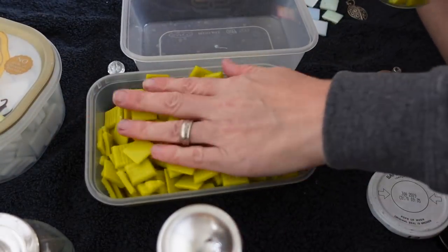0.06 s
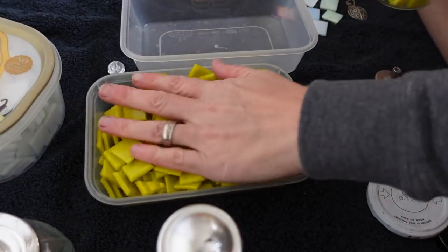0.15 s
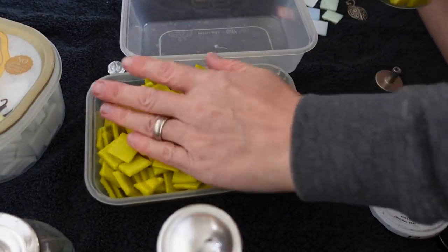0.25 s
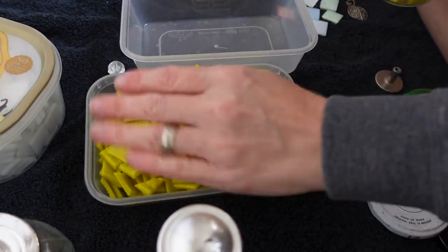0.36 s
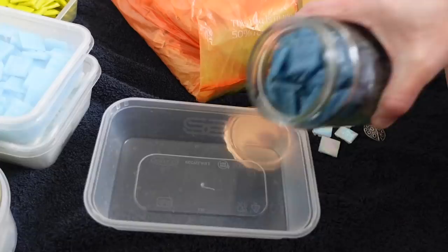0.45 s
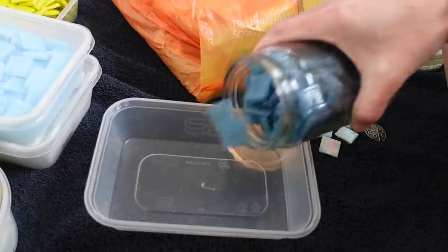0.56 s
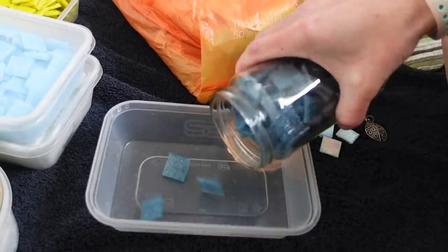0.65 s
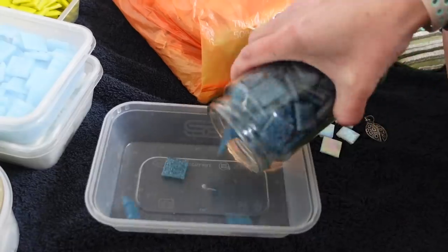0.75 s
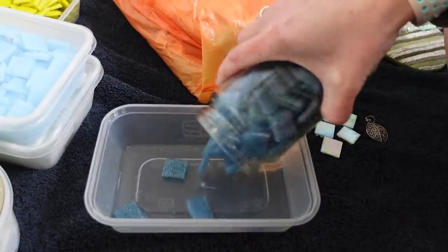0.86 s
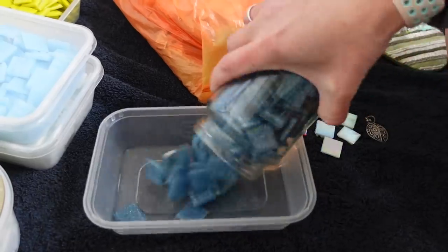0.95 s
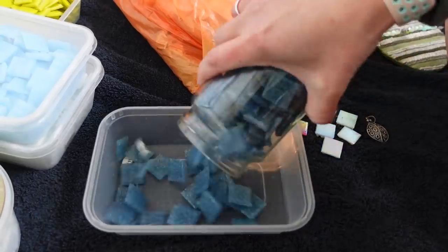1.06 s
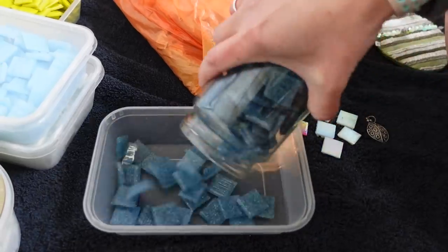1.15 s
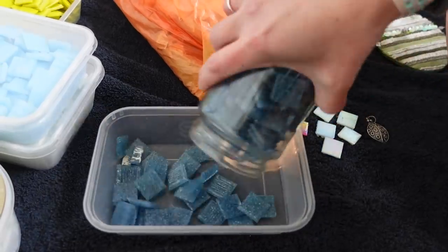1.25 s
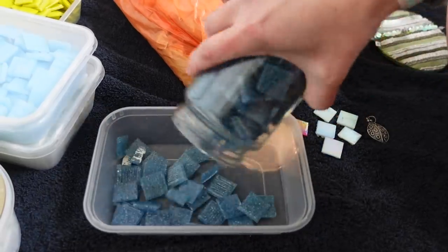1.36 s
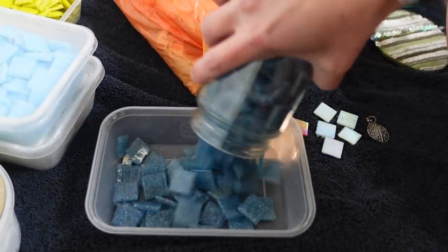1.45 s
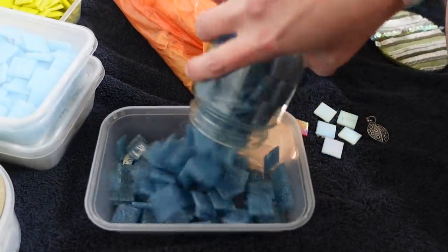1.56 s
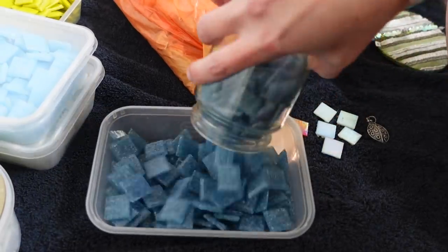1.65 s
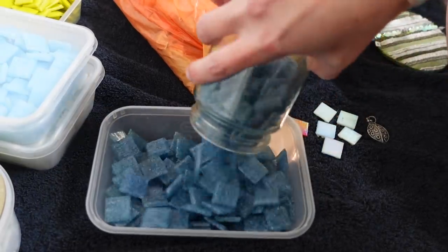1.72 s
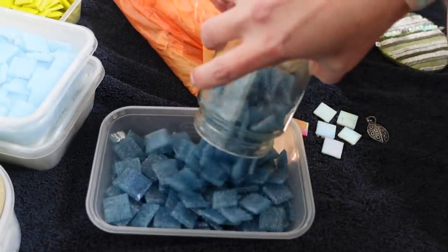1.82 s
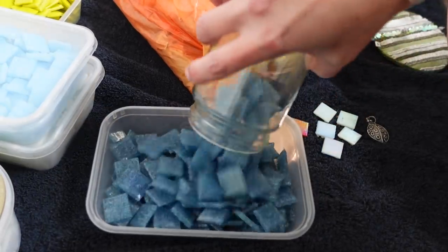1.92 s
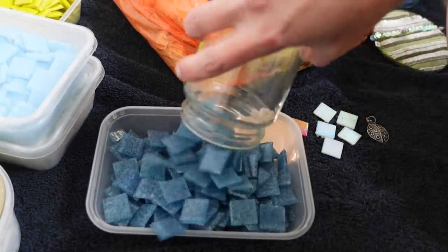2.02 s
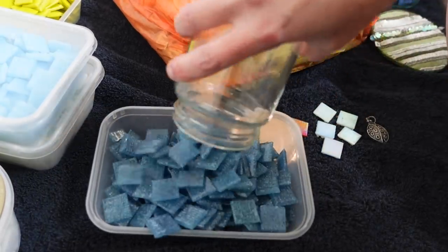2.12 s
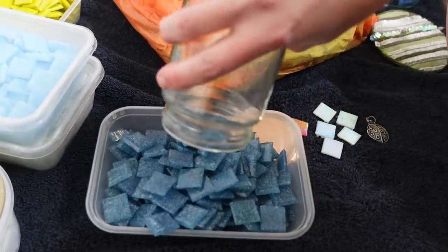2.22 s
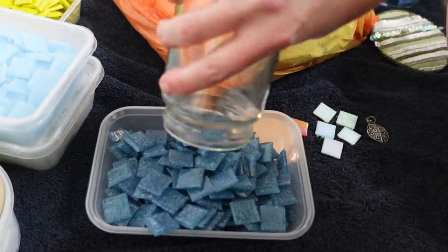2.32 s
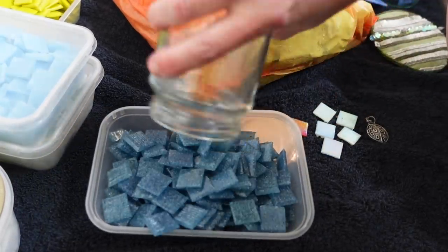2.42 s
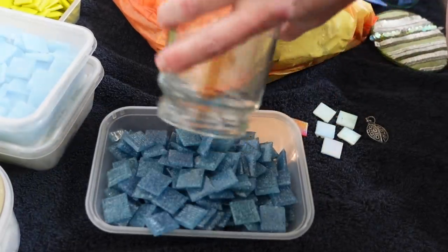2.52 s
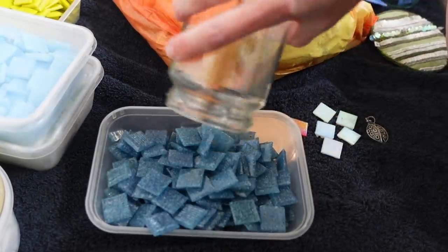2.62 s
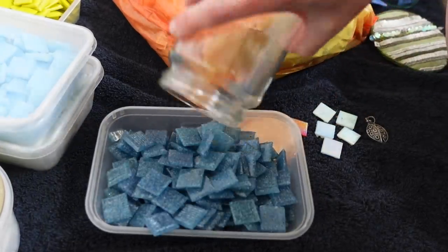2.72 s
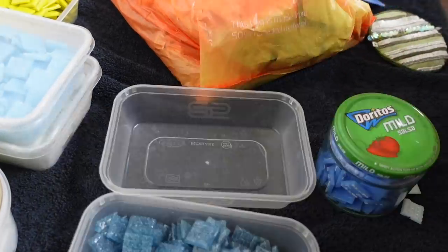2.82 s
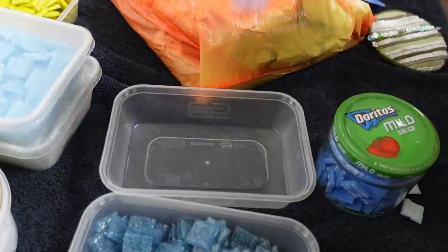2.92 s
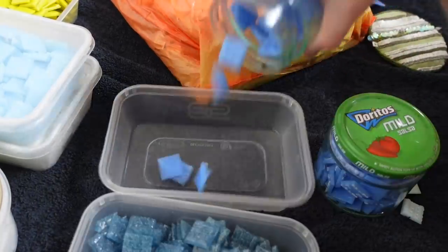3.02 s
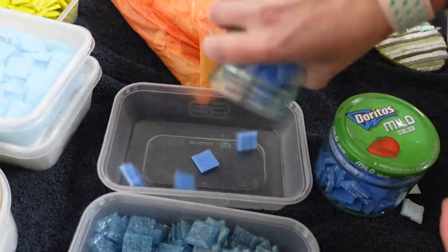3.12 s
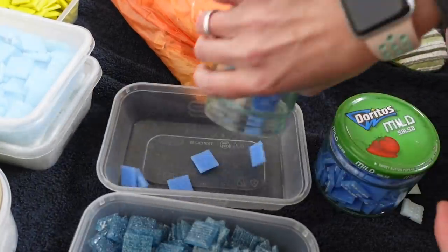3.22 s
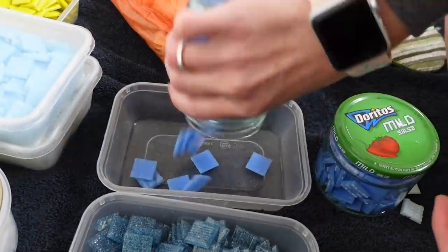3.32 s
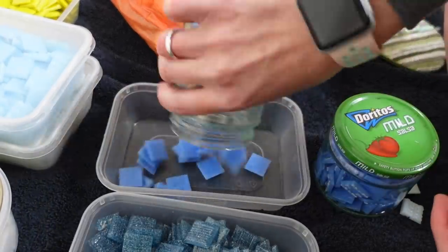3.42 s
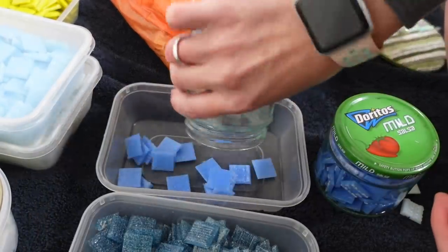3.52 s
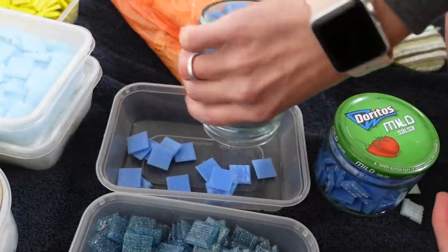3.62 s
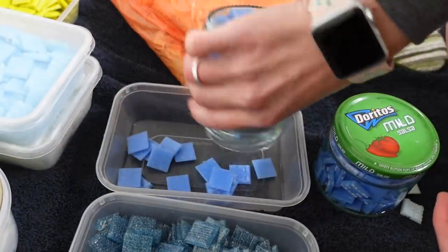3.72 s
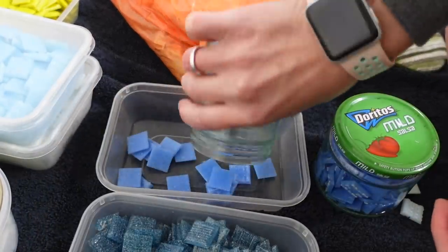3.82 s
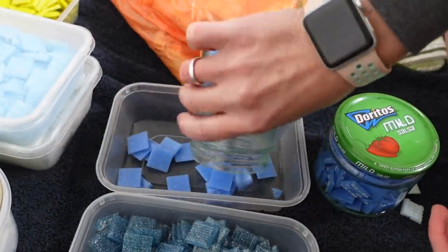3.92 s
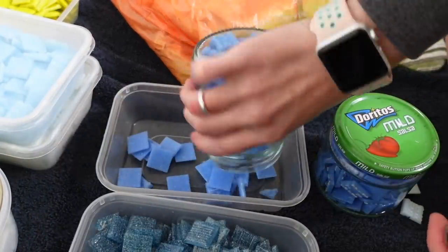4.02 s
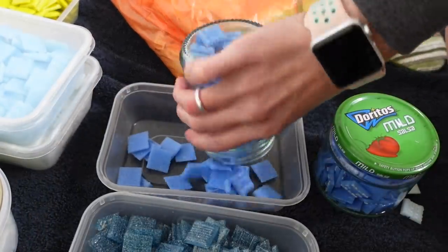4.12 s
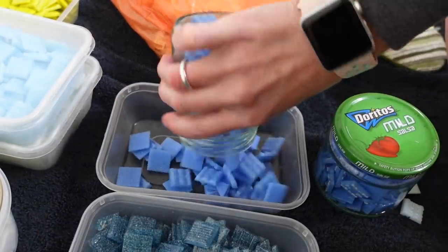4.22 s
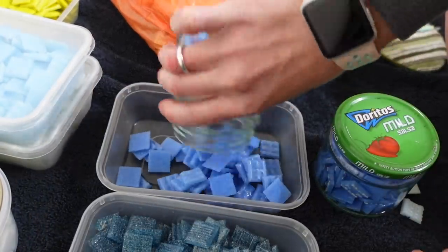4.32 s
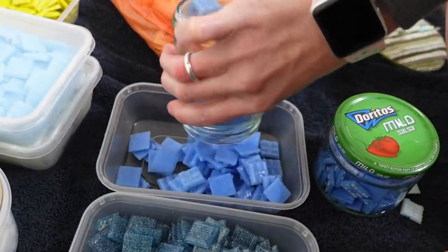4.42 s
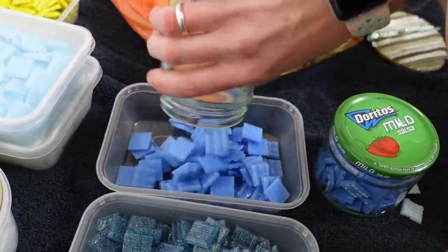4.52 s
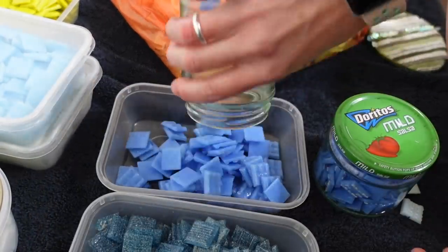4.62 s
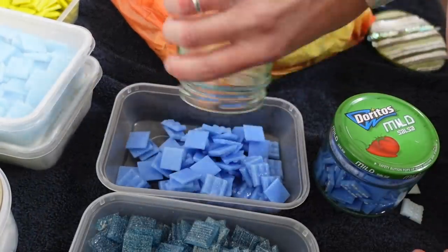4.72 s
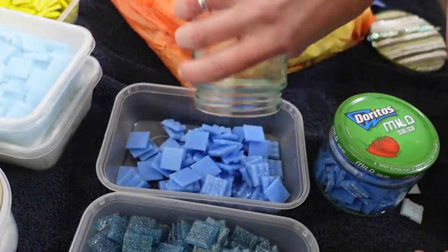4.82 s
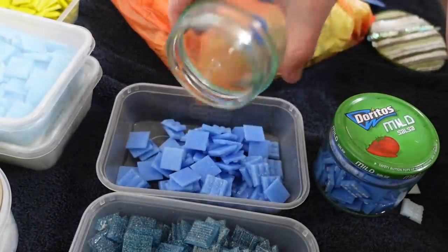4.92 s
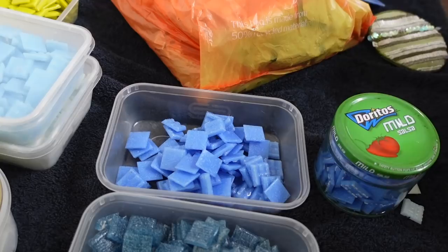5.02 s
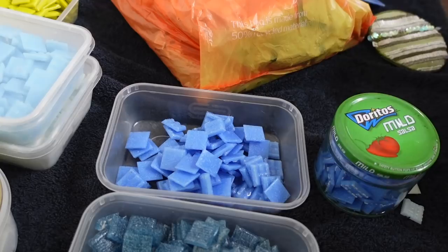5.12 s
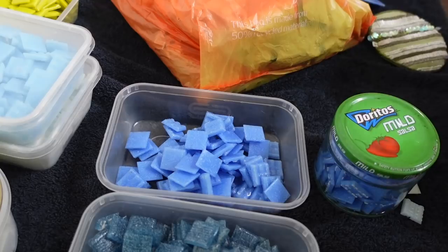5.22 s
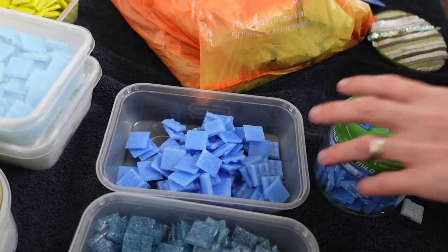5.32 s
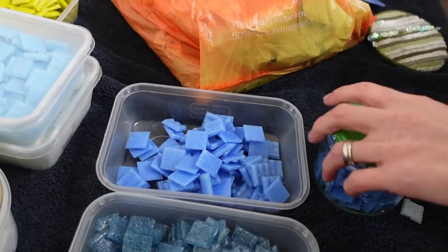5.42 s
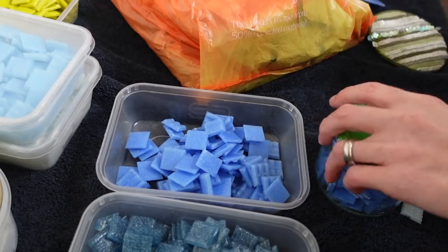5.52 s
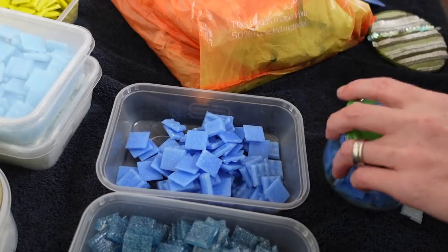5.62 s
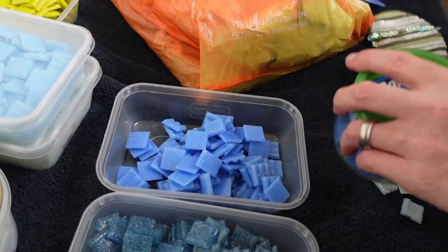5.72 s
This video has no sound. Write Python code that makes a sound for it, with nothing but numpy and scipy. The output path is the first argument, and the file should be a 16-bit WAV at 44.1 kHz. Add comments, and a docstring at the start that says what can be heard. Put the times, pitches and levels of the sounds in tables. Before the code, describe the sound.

Indoors and close-miked: short scraping clicks of stirred glass tiles, then two pours from jars into plastic tubs. The first builds quickly into a thick, crisp cascade; the second starts with single tiles dropping, pauses, then spills in surges with ringing jar clinks. Each changes from hollow plastic knocks to dense glass-on-glass clatter. Finally a near-silent gap with soft hum and one light metallic lid tap.

```python
"""A work table in a small live room: glass mosaic tiles. A hand spreads a tubful, then two glass jars
are tipped into plastic tubs in surges; at the end a hand taps a jar's metal lid.
Sliding, clicking, clinking and landing are noise-cracked decaying modes, set off singly from tables
or as random streams under surge envelopes; filling tubs shift the sound from plastic to heap.
A noise tail gives the room, shaped noise the air and hum; bass ducking and a limiter follow."""
import sys
import numpy as np
from scipy import signal
from scipy.fft import rfft, irfft, next_fast_len
from scipy.io import wavfile
from scipy.ndimage import uniform_filter1d, minimum_filter1d, map_coordinates

SR = 44100
rng = np.random.default_rng(int(sys.argv[2]) if len(sys.argv) > 2 else 0)


def output_pcm(signal):
    """Save a mono or channel-first signal as 16-bit PCM at the path in sys.argv[1].

    Samples are clipped to [-1, 1] before scaling.
    """
    pcm = np.clip(np.atleast_2d(signal).T, -1, 1) * 32767
    wavfile.write(sys.argv[1], SR, np.round(pcm).astype(np.int16))


N = 254015
TIME_S = np.arange(N) / SR

# hand strokes over a full tub: (time [s], length [s], level [dB])
STIRS = [(0.0, 0.006, -17.5), (0.05, .06, -31.5), (0.108, .07, -23.5), (0.225, 0.095, -32),
         (0.365, 0.026, -41)]
# surges out of each jar: (time [s], slide length [s], slide level [dB], wall rattle level [dB],
# delay to landing [s], landing length [s], landing level [dB])
SURGES_A = [(0.505, 0.11, -24.5, -40, 0.13, .15, -16), (0.8, 0.18, -23.5, -27.5, 0.024, 0.12, -15.5),
            (0.929, .16, -19, -32, .03, 0.19, -14), (1.1, 0.28, -20, -31.5, 0.068, .2, -15.5),
            (1.414, 0.067, -12, -17, .012, 0.11, -16), (1.53, 0.34, -19, -26, 0.036, .25, -16),
            (1.838, 0.3, -17.5, -23.5, 0.0048, 0.37, -19.5)]
SURGES_B = [(2.794, 0.039, -34, -37, .243, .07, -19), (2.889, 0.078, -19, -26, .243, .09, -14.5),
            (3.29, 0.18, -27.5, -25, 0.0021, .12, -17.5), (3.39, 0.16, -23.5, -32, .03, 0.16, -15.5),
            (3.893, 0.021, -21.5, -32.5, .057, 0.057, -20), (4.055, .12, -22, -19.5, .002, .09, -21),
            (4.17, .14, -20.5, -22.5, .005, 0.11, -15), (4.32, 0.072, -20, -27, .02, .06, -22.5),
            (4.43, 0.23, -18.5, -23.5, 0.018, .175, -20.5), (4.665, 0.081, -34, -35, .015, .07, -31.5)]
# single tiles dropping into the tub: (time [s], force [dB], glass click re force [dB], floor thud re force [dB])
DROPS = [(0.638, -15, -15, -30), (0.657, 0.5, -13.5, -26), (0.686, -3.5, -10.5, -28.5),
         (0.713, -6, -21, -16), (0.743, -2.5, -16, -23), (0.773, -12.5, -22, -21), (0.795, -2, -11, -25),
         (0.807, -8.5, -12.5, -14), (0.825, -3.5, -12.5, -5.5), (0.845, -9, -19.5, -19.5),
         (0.87, -6, -17.5, -9), (0.922, -7.5, -3.5, -10.5), (1.316, -1.5, -9, -21.5), (1.401, 0, -8, -19.5),
         (2.16, -18, -10, -20), (2.209, -14.5, -3, -17), (2.233, -20, -14, -28), (3.038, -3.5, -6, -14),
         (3.063, 0, -12.5, -18), (3.088, -8, -16, -18), (3.11, -4.5, -22, -17.5), (3.148, 0, -10.5, -15.5),
         (3.181, -2, -9.5, -15), (3.214, -8, -11, -12.5), (3.292, -9, -24, -14.5), (3.3, -5, -16, -31.5),
         (3.32, -11, -24.5, -21.5), (3.499, -9.5, -20.5, -14.5), (3.55, -5.5, -11.5, -21.5),
         (3.628, -5, -16.5, -23.5), (3.949, -7.5, -21.5, -11), (3.964, -11.5, -16, -16),
         (3.992, -4, -8.5, -5), (4.055, -2.5, -8, -10.5), (4.263, -0.5, -8.5, -12.5),
         (4.548, 2.5, -11, -15), (4.611, 6, -23, -21)]
# tiles striking the second jar: (time [s], force [dB])
CLINKS_B = [(2.8088, -9.5), (2.8225, -11), (2.8366, -12), (2.8961, -3.5), (2.9617, -13), (3.0053, -4),
            (3.0227, 0), (3.762, -22), (3.7709, -15), (3.7851, -9), (3.8041, -11), (3.8213, -9.5),
            (3.894, -7), (3.902, 6.5), (3.9233, -5), (4.0293, -4), (4.0421, 4.5), (4.1035, 3.5),
            (4.1264, 3), (4.152, -6), (4.1855, -0.5), (4.2351, -6), (4.263, -2.5), (4.2958, -7),
            (4.3117, -4), (4.3343, -6), (4.3494, 11), (4.4192, 2.5), (4.4987, -1.5), (4.5304, 9.5),
            (4.6239, 0)]
EMPTY_JAR_HZ = 546  # air resonance of an emptied jar


def amp(db):
    """Decibels to gain."""
    return 10 ** (np.asarray(db) / 20)


def unit(x):
    """Scale to rms 1."""
    return x / np.sqrt(np.mean(x ** 2) + 1e-20)


def along(points, hz):
    """Interpolate (frequency [Hz], value) points on a log frequency axis."""
    point_hz, values = np.transpose(points)
    return np.interp(np.log(hz + 1), np.log(point_hz), values)


def filtered(x, response):
    """Apply a zero-phase gain, given as a function of Hz, in the spectrum."""
    m = next_fast_len(N + SR // 2)
    gain = response(np.fft.rfftfreq(m, 1 / SR))
    return irfft(rfft(x, m) * gain, m)[..., :N]


def rings(modes, detune, scatter_db, crack_db, low_hz, crack_t60_s=.004, attack_s=.00014, count=48):
    """Variants of one thing's ring, mean peak 1: each contact point shifts and weights the modes anew."""
    t = np.arange(int(SR * max(m[2] for m in modes))) / SR
    noise = rng.standard_normal((count, SR // 2))[:, :len(t)]
    waves = amp(crack_db - 60 * t / crack_t60_s) * noise
    for hz, db, t60_s in modes:
        shift, weight, side = rng.standard_normal((3, count, 1))
        pitch_hz = np.minimum(hz * np.exp(detune * shift), SR / 2)
        decay = amp(db + scatter_db * weight - 60 * t / t60_s)
        waves = waves + np.sign(side) * decay * np.sin(2 * np.pi * pitch_hz * t)
    # contact builds up gradually; small things radiate little bass
    waves = waves * (1 - np.exp(-t / attack_s))
    waves = signal.sosfilt(signal.butter(3, low_hz, "high", fs=SR, output="sos"), waves)
    waves = waves / np.linalg.norm(waves, axis=1, keepdims=True)
    return waves / np.abs(waves).max(axis=1).mean()


def two_edged(waves, lag_scale_s, second_db, pad=300):
    """A flat tile touches with one edge, then with the other 0.2 to 1.2 lag scales later."""
    lags = (lag_scale_s * SR * (.2 + rng.random(len(waves)))).astype(int).clip(0, pad)
    padded = np.pad(waves, ((0, 0), (0, pad)))
    return np.array([w + amp(second_db) * np.roll(w, lag) for w, lag in zip(padded, lags)])


def strike(times_s, gains, waves):
    """Add one randomly picked ring at each contact."""
    pick = (rng.random(len(times_s)) * len(waves)).astype(int)
    starts = np.round(np.asarray(times_s) * SR).astype(int).clip(0)
    at = starts[:, None] + np.arange(waves.shape[1])
    struck = waves[pick] * np.asarray(gains)[:, None]
    return np.bincount(at.ravel(), struck.ravel(), N)[:N]


def hits(rows, waves):
    """Play rows that begin (time [s], force [dB]); force is capped at 2 dB."""
    times_s, force_db = np.transpose(rows)[:2]
    return strike(times_s, amp(np.minimum(force_db, 2)), waves)


def stream(rate_per_s, waves, spread_db, size=6000):
    """Irregular contacts of uneven force, levelled to a running rms of 1."""
    slip, force = rng.random(size), rng.standard_normal(size)
    passed = np.cumsum(rate_per_s) / SR
    turn = np.arange(size) + 2 * slip
    live = turn < passed[-1]
    times_s = np.interp(turn[live], passed, TIME_S)
    x = strike(times_s, amp(spread_db * force[live]), waves)
    power = uniform_filter1d(uniform_filter1d(x ** 2, size=1500), size=1500)
    return x / np.sqrt(np.abs(power) + 1e-9)


def wobble(knots_per_s):
    """Smooth random curve through normal random knots."""
    return map_coordinates(rng.standard_normal(2000), [knots_per_s * TIME_S], mode="wrap")


def envelope(rows, rise_s, sag_db_per_s, stop_db_per_s):
    """Gain of (time [s], length [s], level [dB]) runs: rise, steady sag, added stopping slope past the length."""
    power = np.zeros(N)
    for start_s, length_s, db in rows:
        age_s = (TIME_S - start_s).clip(0)
        level_db = db - sag_db_per_s * age_s - stop_db_per_s * (age_s - length_s).clip(0)
        power += ((age_s / rise_s).clip(0, 1) * amp(level_db)) ** 2
    return np.sqrt(power)


def slide(rows):
    """Gain of sliding tiles: they let go, thin out, come to rest."""
    return envelope(rows, rise_s=.016, sag_db_per_s=6, stop_db_per_s=330.5)


def land(rows):
    """Gain of landing tiles: a faster rise, then the same course."""
    return envelope(rows, rise_s=.0017, sag_db_per_s=2.5, stop_db_per_s=371)


def landings(surges):
    """Delay each surge to its landing: (time [s], length [s], level [dB])."""
    return [(s + delay_s, length_s, db) for s, _, _, _, delay_s, length_s, db in surges]


def slides(surges):
    """Sliding part of each surge: (time [s], length [s], level [dB])."""
    return [(s, length_s, db) for s, length_s, db, *_ in surges]


def covered():
    """Share of the tub's floor under tiles: each jar gets an empty tub, which fills while tiles land."""
    stir_cover, fill_s, fill_power = .75, 1.2, 1.2  # the first tiles cover least
    cover = np.full(N, stir_cover)
    for surges in (SURGES_A, SURGES_B):
        landed_s = sum((TIME_S - s).clip(0, length_s) for s, length_s, _ in landings(surges))
        cover = np.where(TIME_S < surges[0][0], cover, (landed_s / fill_s) ** fill_power)
    return cover.clip(0, 1)


def background():
    """Still air and a running appliance's narrow drones, all shaped noise."""
    # air spectrum: (frequency [Hz], relative density [dB per Hz])
    air_spectrum = [(25, -16), (65, -20), (100, -2.5), (150, -8), (300, -8), (480, -18.5), (1500, -24),
                    (3000, -23), (5500, -34.5), (10000, -36.5), (16000, -43)]
    # drones: (centre [Hz], full width at half amplitude [Hz], level [dB])
    drones = [(101, 10, -59), (137, 22, -55), (245, 39, -57.5), (913.9, 87, -69), (2140.3, 210, -57)]

    def air():
        return unit(filtered(rng.standard_normal(N), lambda hz: amp(along(air_spectrum, hz))))

    def drone(centre_hz, width_hz):
        noise = rng.standard_normal(N)
        return unit(filtered(noise, lambda hz: 1 / (1 + ((hz - centre_hz) / width_hz * 2) ** 2)))

    hum = sum(amp(db) * drone(hz, width_hz) for hz, width_hz, db in drones)
    mid = amp(-52.5) * air() + hum
    side = amp(-61) * air()
    return np.array([mid + side, mid - side])


def tub(rate_per_s, cover):
    """Tiles knock on bare plastic modes, then clack on the heap's as it covers the floor."""
    # plastic modes: (frequency [Hz], level [dB], t60 [s])
    plastic_modes = [(240, -15.5, 0.03), (490, -12.5, 0.024), (719, -3, 0.011), (870, -7.5, 0.013),
                     (1235, 4, 0.013), (1584, 3, 0.0089), (2283, 2.5, 0.01), (3555, 6, 0.0029)]
    # heap modes: (frequency [Hz], level [dB], t60 [s])
    heap_modes = [(718, -13.5, 0.0042), (1136, -5, 0.014), (1650, -3, 0.017), (2028, -2.5, 0.017),
                  (2530, 5, 0.011), (3430, -11, 0.033), (4830, 3.5, 0.0027)]
    plastic = rings(plastic_modes, detune=.11, scatter_db=3, crack_db=-16, low_hz=310,
                    crack_t60_s=.008, attack_s=.0002)
    plastic = two_edged(plastic, lag_scale_s=.003013, second_db=-3.5)
    heap = rings(heap_modes, detune=.11, scatter_db=3, crack_db=-9, low_hz=600,
                 crack_t60_s=.006, attack_s=.0002)
    knocks = stream(.6 * rate_per_s, plastic, spread_db=4.5)
    clacks = stream(.75 * rate_per_s, heap, spread_db=5.5)
    clumps = amp(1.5 * wobble(30))  # tiles land in clumps
    landing = land(STIRS + landings(SURGES_A) + landings(SURGES_B)) * clumps
    on_plastic = amp(-.5) * landing * knocks + amp(1.5) * hits(DROPS, plastic)
    on_heap = amp(2) * landing * clacks + amp(5) * hits(DROPS, heap)
    return np.sqrt(1 - cover) * on_plastic + np.sqrt(cover) * on_heap


def tiles(rate_per_s, cover):
    """Glass on glass: short broad clicks; sliding tiles catch and let go in bursts, their hard edges tick."""
    # tile modes: (frequency [Hz], level [dB], t60 [s])
    tile_modes = [(2470, -5.5, 0.0068), (4280, -14.5, 0.0011), (5850, 0, 0.0069), (8450, 2, 0.0013),
                  (10190, 6, 0.0036), (15600, 0.5, 0.00043)]
    # tile edge modes: (frequency [Hz], level [dB], t60 [s])
    edge_modes = [(11400, 2, .003), (13600, 0.5, .003)]
    # sharp tile-on-tile clicks: (time [s], force [dB])
    sharp_clicks = [(0.1259, -1), (0.1728, -4.5), (0.246, -9.5), (0.2996, -11.5), (0.3255, -14.5),
                    (0.3531, -6), (0.5362, -6), (0.548, 5.5), (0.569, -9), (0.5763, -3.5), (0.622, 0),
                    (0.7696, -5), (1.3703, -11), (1.3786, -25), (2.1165, 15.5), (2.1494, -3), (2.1897, -14),
                    (2.2154, -4.5), (2.2707, -14), (2.3486, -23), (2.891, -1), (2.9367, 2.5), (2.9625, -1),
                    (2.9987, -1), (3.0825, 4), (3.4126, 4.5), (3.8221, -7), (4.4359, 3), (4.6503, -18),
                    (4.6677, -8.5), (4.722, -5.5), (4.7429, -4), (4.7603, -6.5), (4.789, -15.5)]
    glass = rings(tile_modes, detune=.16, scatter_db=.5, crack_db=7, low_hz=1790,
                  crack_t60_s=.013, attack_s=.000082)
    glass = two_edged(glass, lag_scale_s=.0012, second_db=-7.5)
    edges = rings(edge_modes, detune=.051, scatter_db=2, crack_db=-6.5, low_hz=6000, attack_s=.0001)
    bursts = amp(2.5 * wobble(110))
    bare_click_db, heap_click_db = -17, -5.5  # clicks re landing level: on plastic, on the heap
    click_db = bare_click_db + (heap_click_db - bare_click_db) * cover
    surges = SURGES_A + SURGES_B
    in_jar = slide(slides(surges))
    in_tub = amp(-2.5) * land(STIRS) + amp(click_db) * land(landings(surges))
    clicks = stream(.9 * rate_per_s, glass, spread_db=6.3)
    ticks = stream(.3 * rate_per_s, edges, spread_db=7.5)
    sliding = np.hypot(in_jar, in_tub) * bursts * (clicks + amp(-9) * ticks)
    dropped = hits([(s, db + glass_db) for s, db, glass_db, _ in DROPS], glass)
    return sliding + amp(10.5) * dropped + amp(-1.5) * hits(sharp_clicks, glass)


def room(x, side_db):
    """Noise tail dying at its own speed at each frequency; nearly the same in both ears."""
    # reverberation: (frequency [Hz], t60 [s])
    decay_t60 = [(200, 0.67), (800, 0.52), (2000, 0.39), (3200, 0.42), (5500, 0.43), (11000, 0.36),
                 (16000, 0.17)]
    hz, t, z = signal.stft(rng.standard_normal((2, SR * 2 // 3)), SR, nperseg=256)
    decay = amp(-60 * t / along(decay_t60, hz)[:, None]) * (1 - np.exp(-t / .00067))
    tail = signal.istft(z * decay, SR, nperseg=256)[1]
    tail = tail / np.linalg.norm(tail[0])
    mid, side = signal.fftconvolve(x[None], tail, axes=1)[:, :N]
    return np.array([mid + amp(side_db) * side, mid - amp(side_db) * side])


def jars(rate_per_s, cover):
    """Tiles rattle and clink on the jar walls; the second, damped by its load, rings longer as it empties."""
    # first jar's modes: (frequency [Hz], level [dB], t60 [s])
    first_modes = [(2950, -1, .04), (5450, -1, .014), (9080, -5, .016), (11050, -3, .012), (11540, -6, .02)]
    # second jar's free modes: (frequency [Hz], level [dB], t60 [s])
    second_modes = [(769, -37.5, 0.11), (2450, -7, 0.0072), (2880, -11.5, 0.021), (3180, 3, 0.022),
                    (7470, -6.5, 0.0089), (7970, -12, 0.024), (10130, -10, 0.016)]
    # tiles striking the first jar: (time [s], force [dB])
    first_clinks = [(0.557, -6.5), (0.574, -1), (0.622, -4.5), (1.458, 0.5), (1.48, -4)]
    first = rings(first_modes, detune=.018, scatter_db=3, crack_db=-3, low_hz=2000,
                  crack_t60_s=.007, attack_s=.0002)
    # clinks leave out the lowest mode
    first_loaded = rings(first_modes[1:], detune=.018, scatter_db=2, crack_db=-5, low_hz=2000,
                         crack_t60_s=.007, attack_s=.0002)
    second = rings(second_modes, detune=.006, scatter_db=2, crack_db=-5, low_hz=550,
                   crack_t60_s=.007, attack_s=.0002)
    damped_modes = [(hz, db, t60_s * .5) for hz, db, t60_s in second_modes]
    second_loaded = rings(damped_modes, detune=.028, scatter_db=-.5, crack_db=-2.5, low_hz=1000,
                          crack_t60_s=.007, attack_s=.00015)

    def on_wall(surges):
        return slide([(s, length_s, wall_db) for s, length_s, _, wall_db, *_ in surges])

    rattle_a = on_wall(SURGES_A) * stream(.2 * rate_per_s, first, spread_db=5)
    rattle_b = on_wall(SURGES_B) * stream(.2 * rate_per_s, second, spread_db=5)
    free_at_cover = .34  # tub cover at which the second jar rings freely
    free = (cover / free_at_cover).clip(0, 1) ** 2
    free_clinks = amp(3.5) * np.sqrt(free) * hits(CLINKS_B, second)
    loaded_clinks = amp(3) * np.sqrt(1 - free) * hits(CLINKS_B, second_loaded)
    first_jar = amp(2.5) * rattle_a + amp(2) * hits(first_clinks, first_loaded)
    return first_jar + rattle_b + free_clinks + loaded_clinks


def thuds():
    """The tub's floor gives under a dropping tile: two low modes."""
    # tub floor modes: (frequency [Hz], level [dB], t60 [s])
    floor_modes = [(574, 0, 0.026), (693, -1, 0.053)]
    floor = rings(floor_modes, detune=.091, scatter_db=2, crack_db=-19.5, low_hz=364, attack_s=.00027)
    return hits([(s, db + thud_db) for s, db, _, thud_db in DROPS], floor)


def emptied(cover):
    """Little damps a nearly empty jar: its main mode sings on, and a knock sounds the air inside."""
    # knocks on the jar's air: (time [s], force [dB])
    air_knocks = [(2.21, -27)]
    sing = rings([(3166, 0, .48)], detune=.002, scatter_db=1, crack_db=-40, low_hz=1000)
    air = rings([(EMPTY_JAR_HZ, 0, .14)], detune=.0033, scatter_db=1, crack_db=-30, low_hz=300,
                attack_s=.0007)
    return amp(-24.5) * cover * hits(CLINKS_B, sing) + hits(air_knocks, air)


def hollow(rate_per_s, cover):
    """Sliding tiles stir the second jar's air, whose resonance crossfades lower as the tub fills."""
    full_jar_hz = 742

    def air(hz):
        waves = rings([(hz, 0, .08)], detune=.025, scatter_db=1, crack_db=-30, low_hz=350, attack_s=.001)
        return stream(.3 * rate_per_s, waves, spread_db=3)

    resonance = np.sqrt(1 - cover) * air(full_jar_hz) + np.sqrt(cover) * air(EMPTY_JAR_HZ)
    return amp(-24.5) * slide(slides(SURGES_B)) * resonance


def shimmer():
    """A faint glassy ring: high modes of a glass clink, played only through the room tail."""
    # glass modes: (frequency [Hz], level [dB], t60 [s])
    shimmer_modes = [(3050, -4.5, .02), (3830, 2.5, 0.0037), (4980, -2, 0.0032), (6030, -4.5, 0.016),
                     (7400, -5.5, 0.0027), (9420, 4, 0.0051)]
    # excitations of the tail: (time [s], force [dB])
    tail_starts = [(5.062, -16.5), (5.075, -15), (5.088, -11)]
    glass = rings(shimmer_modes, detune=.017, scatter_db=-.5, crack_db=-5, low_hz=2410, crack_t60_s=.0086)
    return hits(tail_starts, glass)


def lid():
    """A hand meets the metal lid of a full jar: long low modes, short high ones."""
    # lid modes: (frequency [Hz], level [dB], t60 [s])
    lid_modes = [(547, -17.5, 0.26), (832, -25.5, .15), (1400, -12, 0.005), (1820, -13, 0.025),
                 (2410, -5, 0.037), (3830, 0.5, 0.012), (4300, 4.5, 0.0073), (4830, 0, 0.007),
                 (6096, -2.5, 0.009), (7300, -4, .005), (10260, -15.5, .01)]
    # tap: (time [s], force [dB])
    taps = [(5.427, -5)]
    metal = rings(lid_modes, detune=.004, scatter_db=2, crack_db=-17.5, low_hz=351.5,
                  crack_t60_s=.026, attack_s=.00015)
    return amp(-.5) * hits(taps, metal)


def scene():
    """Close sounds, room tail and background; the fuller the tub, the more contacts."""
    # brief level dips: time [s]
    dip_times = [.487, 2.787, 5.052]
    cover = covered()
    bare_per_s, heap_per_s = 320, 850  # base contact rates, scaled in each layer
    rate_per_s = bare_per_s + (heap_per_s - bare_per_s) * cover
    close = tub(rate_per_s, cover) + tiles(rate_per_s, cover) + jars(rate_per_s, cover)
    close = close + thuds() + emptied(cover) + hollow(rate_per_s, cover) + lid()
    sound = close + amp(-9) * room(close + shimmer(), side_db=-13) + background()
    dips = [1 - .85 * np.exp(-((TIME_S - s) / .009) ** 2) for s in dip_times]
    return sound * np.prod(dips, axis=0)


def bass_duck(x):
    """Turn the bass down while the treble is loud."""
    threshold_db, slope_db_per_db, corner_hz = -22, 3.5, 220
    treble = filtered(x.mean(axis=0), lambda hz: hz > 5000)
    treble_db = 10 * np.log10(np.abs(uniform_filter1d(treble ** 2, size=9000)) + 1e-12)
    gain = amp(-slope_db_per_db * (treble_db - threshold_db).clip(0))
    bass = filtered(x, lambda hz: 1 / (1 + (hz / corner_hz) ** 4))
    return x - (1 - gain) * bass


def limiter(x):
    """Duck the gain for a few milliseconds around each peak above 0.9."""
    needed = np.minimum(1, .9 / (np.abs(x).max(axis=0) + 1e-9))
    return x * uniform_filter1d(minimum_filter1d(needed, size=101), size=101)


def record(dry):
    """Microphone colour, bass ducking, limiter, band limit."""
    # microphone response: (frequency [Hz], gain [dB])
    mic_response = [(100, -2.5), (300, -2.5), (700, 0), (1400, 1), (2800, -1.5), (4500, 2), (7500, 2.5),
                    (11500, 0), (14000, -4), (15900, -2)]
    top_hz = 15950
    x = filtered(dry, lambda hz: amp(along(mic_response, hz)))
    x = limiter(bass_duck(x))
    return filtered(x, lambda hz: hz < top_hz)


dry = scene()
out = record(dry)
output_pcm(out)
```